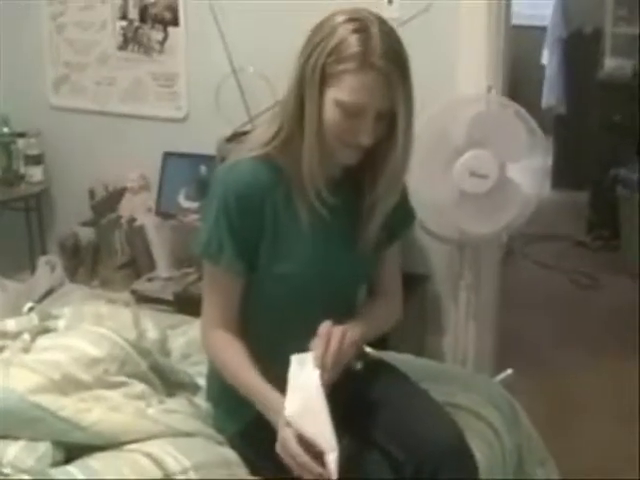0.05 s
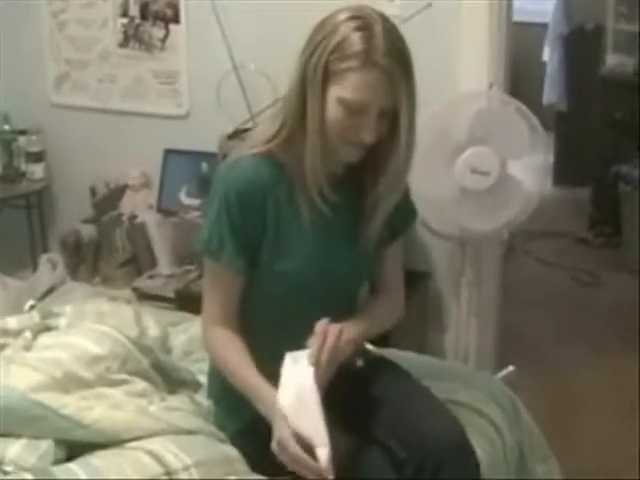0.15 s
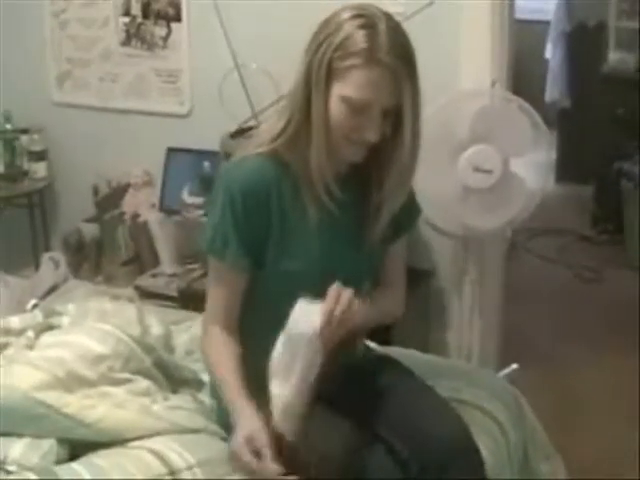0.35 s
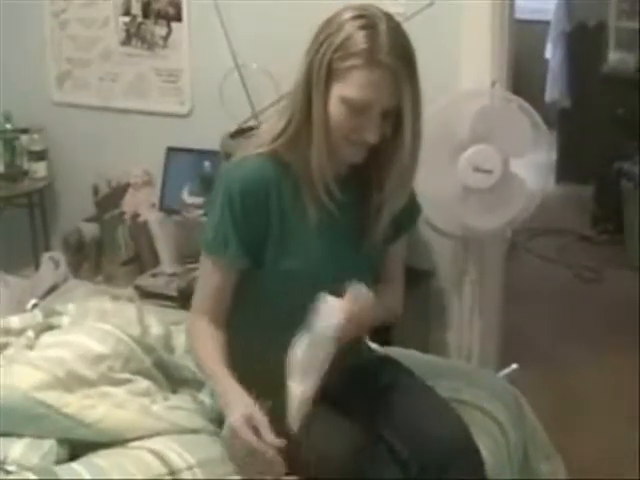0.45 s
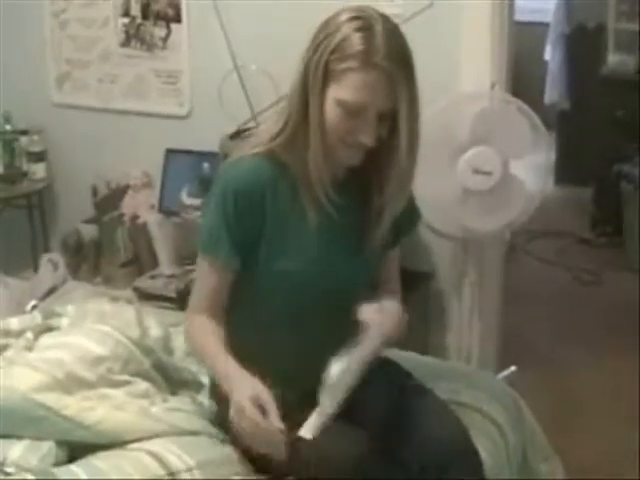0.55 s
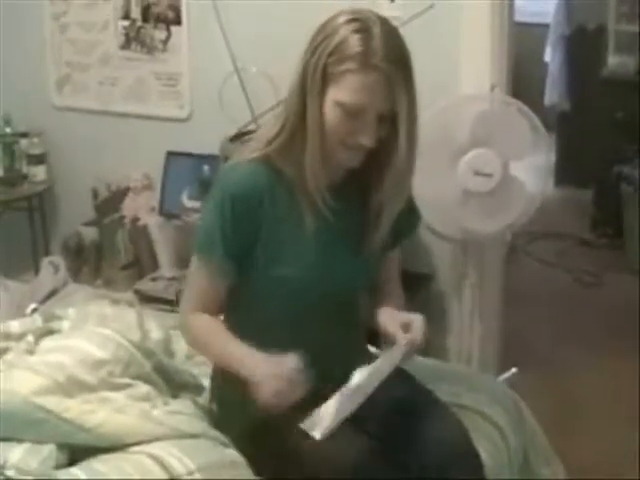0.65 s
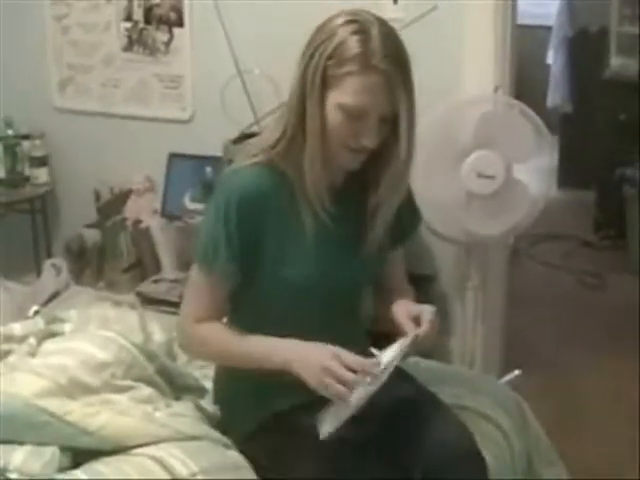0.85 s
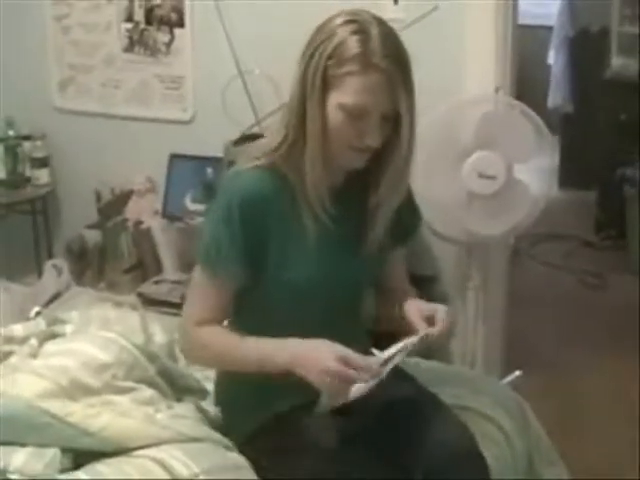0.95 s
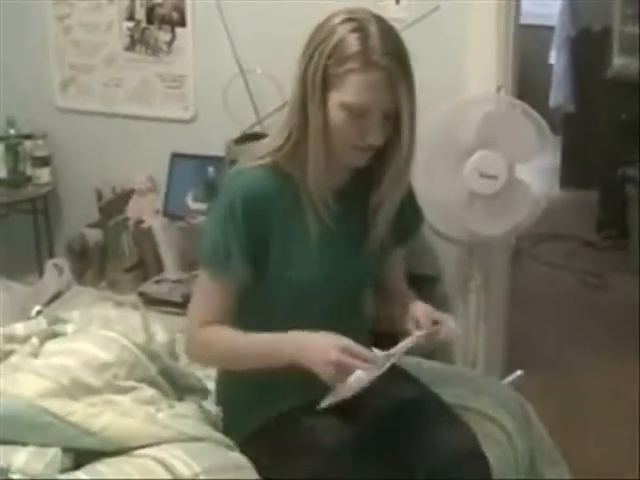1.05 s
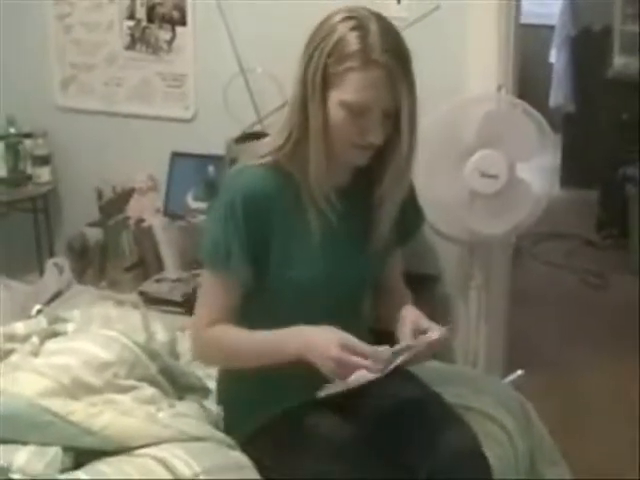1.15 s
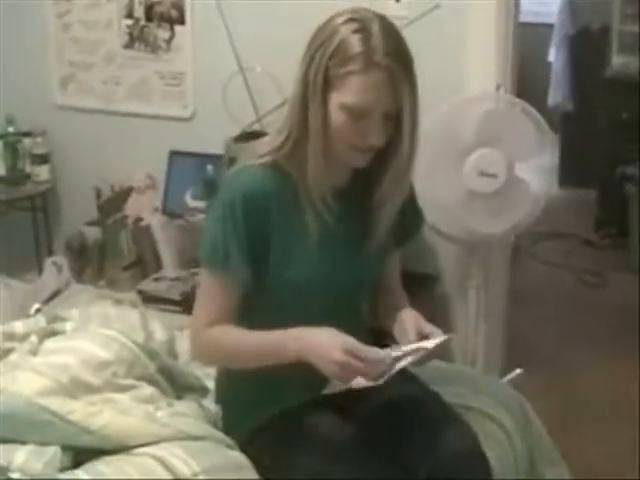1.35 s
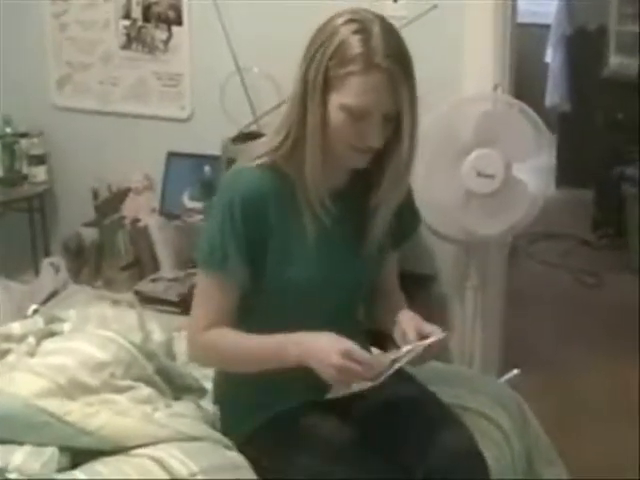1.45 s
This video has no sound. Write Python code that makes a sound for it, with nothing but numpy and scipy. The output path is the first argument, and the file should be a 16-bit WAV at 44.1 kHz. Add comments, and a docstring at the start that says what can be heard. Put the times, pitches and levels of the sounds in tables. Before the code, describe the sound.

Stiff paper envelope handled in a small bedroom: small crackles, a loud sharp rip and snap, a second softer snap with rustling, then faint ticks, a couple of metres from the microphone, over soft hiss and motor whine.

```python
"""In a small bedroom, a paper envelope is ripped open and handled a couple of metres from the microphone.
The stiff paper buckles in sharp snaps: a pressure pulse, a burst of crackle and a short ringing note.
Tearing and sliding are runs of tiny fibre clicks; two soft low thumps come from the whole envelope.
The room answers with a short tail made of fading noise.
Under it all lie a soft hiss of coloured noise and the whine of a small motor, a sum of steady sines."""
import sys
import numpy as np
from scipy import signal
from scipy.fft import rfft, irfft
from scipy.io import wavfile

SR = 44100
rng = np.random.default_rng(int(sys.argv[2]) if len(sys.argv) > 2 else 0)


def dump(signal):
    """Clip the signal to [-1, 1] and save it as 16-bit WAV at the path in sys.argv[1]."""
    limited = np.clip(np.atleast_2d(signal).T, -1, 1)
    pcm = np.round(limited * 32767).astype(np.int16)
    wavfile.write(sys.argv[1], SR, pcm)


N = 66150
T = np.arange(N) / SR   # time of each sample, in seconds

# colour of the paper's sound: (frequency [Hz], relative level per Hz [dB])
PAPER_COLOUR = [(30, -40), (100, -35), (160, -21.5), (215, -5), (330, -5), (470, -2), (720, -3), (1150, 0),
                (1700, -2.5), (2100, -2), (3200, -0.5), (4700, -5), (5900, -11), (8000, -14), (9600, -11),
                (12000, -20)]
FIBRES_PER_S, FIBRE_SPREAD_DB = 6500, 3.5
BODY_HZ, TREBLE_HZ = 1300, 4630   # body lies below the first, treble above the second
LEVEL_SPAN_S = 0.01   # the levels of snaps and thumps are averages over this time


def from_db(db):
    """Turn decibels into a gain."""
    return 10 ** (np.asarray(db) / 20)


def unit(x):
    """Scale a sound to an energy (sum of squares) of one."""
    return x / np.sqrt(np.sum(x ** 2) + 1e-20)


def colour(x, points):
    """Filter by a smooth curve of (frequency [Hz], gain [dB])."""
    curve_hz, curve_db = np.transpose(points)
    hz = np.maximum(np.fft.rfftfreq(2 * N, 1 / SR), 1)
    gain = from_db(np.interp(np.log(hz), np.log(curve_hz), curve_db))
    return irfft(rfft(x, 2 * N) * gain)[:N]


def shelf(x, hz, db):
    """Raise or lower everything above a frequency, with a slope one octave wide."""
    return colour(x, [(hz / np.sqrt(2), 0), (hz * np.sqrt(2), db)])


def tone(x, body_db, treble_db):
    """Slack paper has more body, taut paper more treble."""
    less_above_body = shelf(x, BODY_HZ, -body_db)
    return shelf(less_above_body, TREBLE_HZ, treble_db)


def stereo(mid, side):
    """Join a middle and a side part into two channels: wide below 4 kHz and nearly mono above."""
    # stereo width of room sound and hiss, narrowed above about 4 kHz:
    # (frequency [Hz], side level relative to mid [dB])
    width_curve = [(100, -12), (400, -6), (1200, -4.5), (2200, -6), (3850, -4.5), (4400, -56), (12000, -27)]
    return mid + colour(side, width_curve) * np.array([[1], [-1]])


def envelope(start, hold, attack, release):
    """Exponential rise up to the start, then a hold, then an exponential fall."""
    before = np.minimum(T - start, 0)
    after = np.maximum(T - start - hold, 0)
    return np.exp(before / attack - after / release)


def ring(start, hz, decay):
    """A damped sine from a given time on; it falls to 1/e in the decay time."""
    age = np.maximum(T - start, 0)
    return np.sin(2 * np.pi * hz * age) * np.exp(-age / decay)


def fibres():
    """Fibres catch and break at random moments, giving tiny clicks of uneven size."""
    sizes = from_db(FIBRE_SPREAD_DB * np.minimum(rng.exponential(1, N), 4))
    signs = rng.choice([-1, 1], N)
    breaks = rng.random(N) < FIBRES_PER_S / SR
    return sizes * signs * breaks


def hiss():
    """A steady hiss: coloured random noise, spread between the two channels."""
    # colour of the hiss: (frequency [Hz], relative level per Hz [dB])
    hiss_colour = [(25, -26), (60, -18), (130, -5.5), (260, 0.5), (500, -7.5), (800, -6.5), (1800, -6.5),
                   (2600, -10), (4500, -14.5), (6000, -19.5), (8300, -20), (10300, -12), (12000, -25)]
    mid_db = -58
    noises = rng.standard_normal((2, N))
    mid, side = [unit(colour(noise, hiss_colour)) * np.sqrt(N) for noise in noises]
    return from_db(mid_db) * stereo(mid, side)


def motor_whine():
    """A small motor whines at multiples of one pitch, with one more thin tone high above."""
    # harmonics of the motor: (multiple of its pitch, RMS level [dB])
    harmonics = [(1, -72), (2, -76), (3, -75), (6, -67.5), (7, -72), (8, -73), (9, -71.5), (11, -76.5),
                 (14, -74.5), (15, -75.5), (17, -97), (18, -77.5)]
    motor_hz = 298
    thin_hz, thin_db = 6401, -76
    lines = [(multiple * motor_hz, db) for multiple, db in harmonics] + [(thin_hz, thin_db)]
    whine = np.zeros(N)
    for hz, db in lines:
        sine = np.sin(2 * np.pi * (hz * T + rng.random()))   # each starts at a random phase
        whine += from_db(db) * np.sqrt(2) * sine
    return whine


def bedroom(x):
    """Dense reflections build up within milliseconds and die quickly."""
    # colour of the room's answer: (frequency [Hz], gain [dB])
    echo_colour = [(110, -22), (220, 2), (500, -1.5), (1500, 2), (4000, -1), (11000, -6.5)]
    delay_s, build_s = 0.0028, 0.0018
    t60_s = 0.24   # time to fade by 60 dB
    room_db = 0
    age = np.maximum(T - delay_s, 0)
    fade = (1 - np.exp(-age / build_s)) * from_db(-60 * age / t60_s)
    echoes = []
    for noise in rng.standard_normal((2, N)):
        response = colour(unit(fade * noise), echo_colour)
        echoes.append(signal.fftconvolve(x, response)[:N])
    mid, side = echoes
    return from_db(room_db) * stereo(mid, side)


def thumps():
    """The whole envelope flexes and pushes out a puff of air: a low, short note."""
    # thumps: (time [s], level [dB], pitch [Hz])
    thump_list = [(0.375, -39, 500), (0.882, -47, 248)]
    decay_s = 0.009
    out = np.zeros(N)
    for start, db, hz in thump_list:
        out += from_db(db) * unit(ring(start, hz, decay_s))
    return out * np.sqrt(LEVEL_SPAN_S * SR)


def strokes():
    """Tearing and sliding: a dense run of fibre clicks while the hand moves."""
    # strokes: (start [s], length [s], level [dB], body [dB], treble [dB])
    stroke_list = [(0.0, .055, -56.5, 0.5, 4.5), (0.146, 0.04, -51, 5.5, -1.5), (0.219, 0.032, -42.5, 3, 1),
                   (0.384, 0.032, -33, -0.5, 3.5), (0.734, 0.031, -58, 10, -20),
                   (0.895, .035, -52, -13, 11), (0.953, 0.043, -44.5, 3, 6), (1.020, 0.018, -42.5, -5.5, 4),
                   (1.038, 0.033, -50.5, -0.5, 9), (1.203, 0.08, -60, 5, 10), (1.299, 0.031, -55.5, 7, -2),
                   (1.339, 0.012, -56, 9, 6), (1.372, 0.092, -62, 0, 8.5)]
    attack_s, release_s = 0.0084, 0.012
    out = np.zeros(N)
    for start, length, db, body_db, treble_db in stroke_list:
        clicks = fibres() * envelope(start, length, attack_s, release_s)
        crackle = tone(colour(clicks, PAPER_COLOUR), body_db, treble_db)
        out += from_db(db) * unit(crackle) * np.sqrt(length * SR)
    return out


def snaps():
    """Each buckle gives a pressure pulse with crackle, and a brief panel ring; returns both apart."""
    # buckles of the paper: (time [s], level [dB], crackle decay [s], panel pitch [Hz],
    # panel ring relative to the crack [dB], body [dB], treble [dB])
    snap_list = [(0.001, -47.5, 0.001, 2560, -2.5, -1.5, -5), (0.016, -46.5, 0.0016, 2190, 1, -7, -4),
                 (0.027, -61, 0.0049, 2460, -5, -5, 7), (0.039, -53.5, 0.00077, 2500, -10, -6, 1),
                 (0.1119, -39.5, 0.0048, 1560, 6, 5.5, -5), (0.1208, -40, 0.0017, 1520, -13, -1, 11),
                 (0.1916, -44.5, 0.0058, 2080, -1, -4, 7), (0.2034, -42, .002, 2860, 2, -6, 7),
                 (0.2152, -34.5, 0.003, 2920, -12, -5.5, -2), (0.3615, -47.5, 0.0053, 950, -9, 9, 3),
                 (0.3728, -27, 0.0085, 2030, -8.5, 0, 9.5), (0.3752, -21.5, 0.0027, 3140, -9, 1.5, -1.5),
                 (0.3865, -33.5, 0.0005, 3360, -23, -3, -7), (0.4150, -34.5, 0.0027, 2540, -9, -1, 4.5),
                 (0.5410, -43.5, 0.0037, 2400, -17, -4, -4), (0.8805, -36.5, 0.0074, 1244, 8, -4, 10),
                 (0.8823, -29.5, 0.0046, 2250, -8.5, -3, 2), (0.9302, -37.5, 0.0015, 1120, 2.5, 4, -1),
                 (0.9425, -45, 0.002, 880, -3, 3, -4), (0.9688, -43, .002, 1130, -1, 3, 2),
                 (0.9789, -39.5, .003, 1205, -14, -2.5, 1), (1.0185, -41.5, 0.0036, 2530, -3.5, -7, -10),
                 (1.315, -52, .004, 2750, -7, -7, -2), (1.322, -48, 0.0035, 865, -5.5, -1.5, -9),
                 (1.384, -60, 0.0011, 3060, -4, -9, -8)]
    attack_s = 0.00069
    ring_cycles = 6.2   # cycles in which a panel's ring falls to 1/e
    pop_width_s, pop_db = 0.00008, -6.5   # the pulse as a panel flips; level relative to the crackle
    cracks, rings = np.zeros((2, N))
    for start, db, decay, panel_hz, ring_db, body_db, treble_db in snap_list:
        flip = (T - start) / pop_width_s
        pulse = flip * np.exp(-flip ** 2 / 2)   # one swing down, one up
        pop = unit(colour(pulse, PAPER_COLOUR))
        clicks = fibres() * envelope(start, 0, attack_s, decay)
        crackle = unit(colour(clicks, PAPER_COLOUR))
        crack = unit(tone(crackle + from_db(pop_db) * pop, body_db, treble_db))
        panel_note = ring(start, panel_hz, ring_cycles / panel_hz)
        panel = from_db(ring_db) * unit(colour(panel_note, PAPER_COLOUR))
        # the level counts the energy of crack and ring together
        gain = from_db(db) * np.sqrt(LEVEL_SPAN_S * SR / (1 + from_db(ring_db) ** 2))
        cracks += gain * crack
        rings += gain * panel
    return cracks, rings


def scene():
    """The paper straight ahead, its room sound and the background."""
    panel_room_db = -4   # the flat panels beam at the microphone and stir the room less
    cracks, rings = snaps()
    paper = cracks + thumps() + strokes()
    room = bedroom(paper + from_db(panel_room_db) * rings)
    return paper + rings + room + hiss() + motor_whine()


def record(dry):
    """A steep filter removes the very top of the sound."""
    cutoff_hz = 12200
    # order 10, 0.3 dB ripple below the cutoff, at least 80 dB down well above it
    low_pass = signal.ellip(10, 0.3, 80, cutoff_hz, fs=SR, output="sos")
    return signal.sosfilt(low_pass, dry)


dry = scene()
out = record(dry)
dump(out)
```